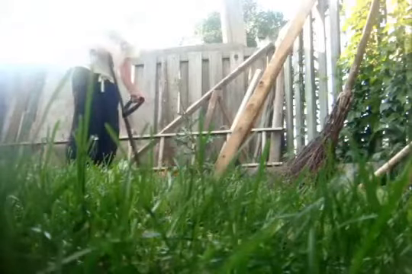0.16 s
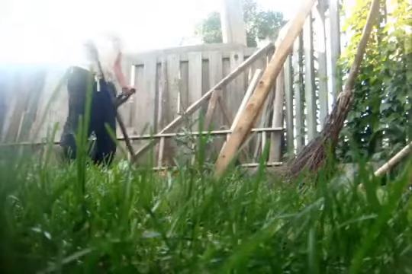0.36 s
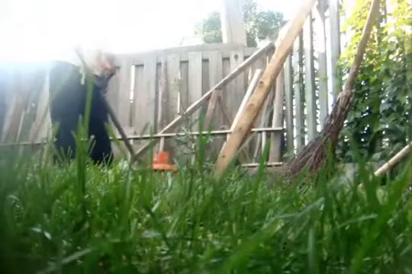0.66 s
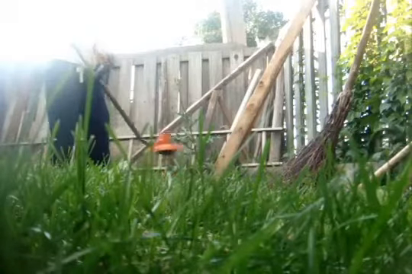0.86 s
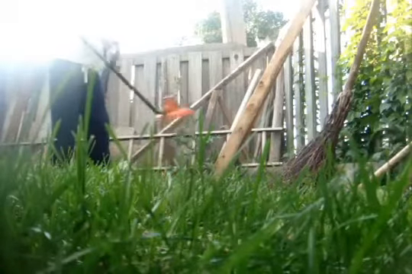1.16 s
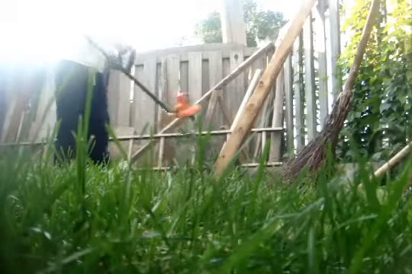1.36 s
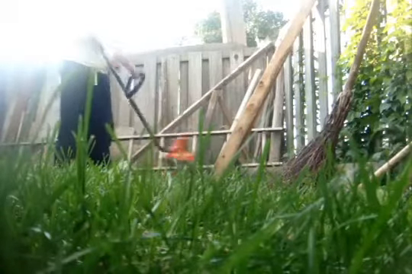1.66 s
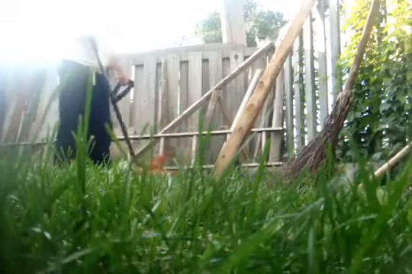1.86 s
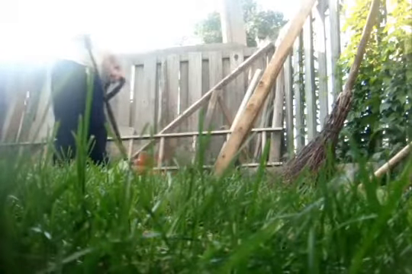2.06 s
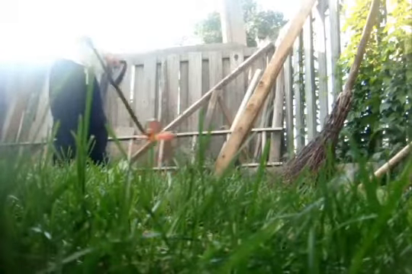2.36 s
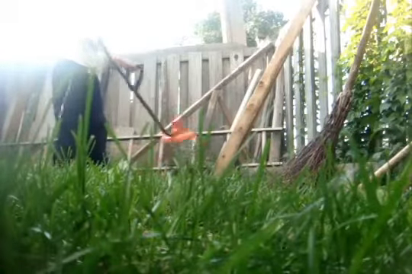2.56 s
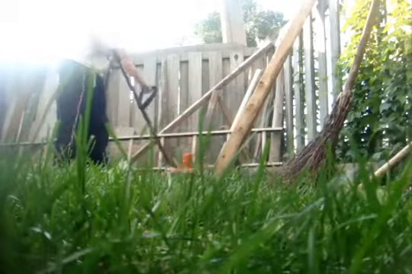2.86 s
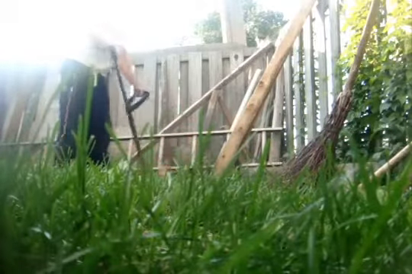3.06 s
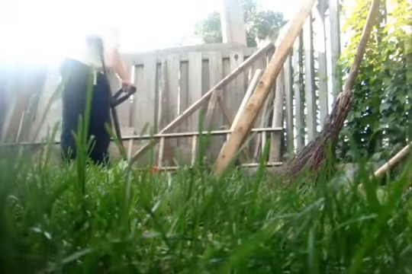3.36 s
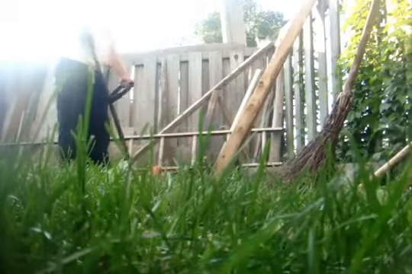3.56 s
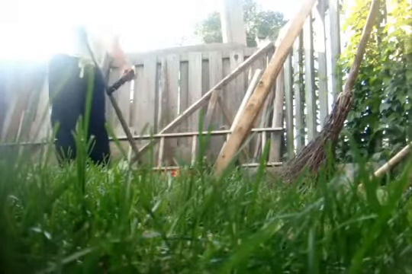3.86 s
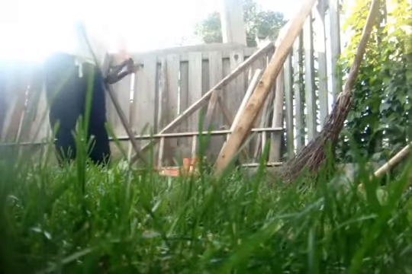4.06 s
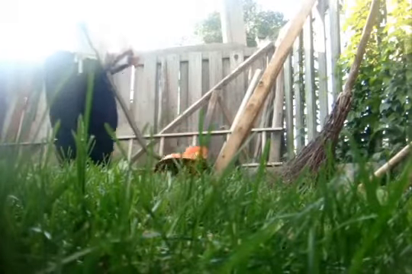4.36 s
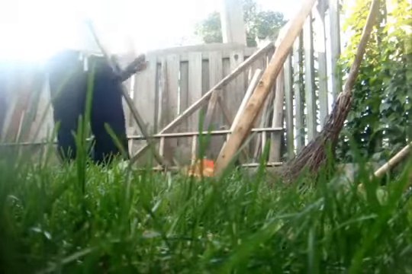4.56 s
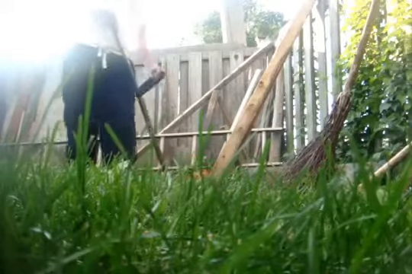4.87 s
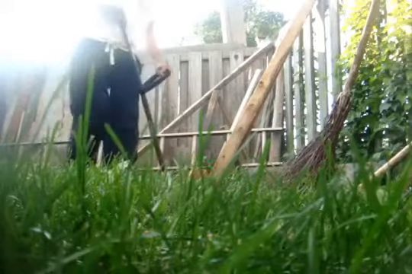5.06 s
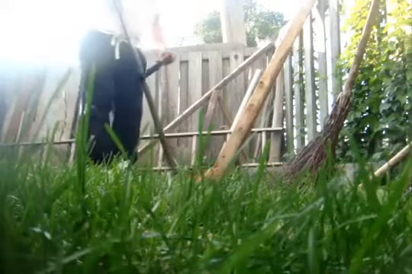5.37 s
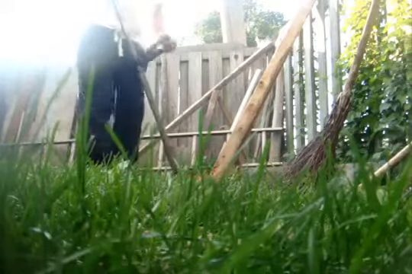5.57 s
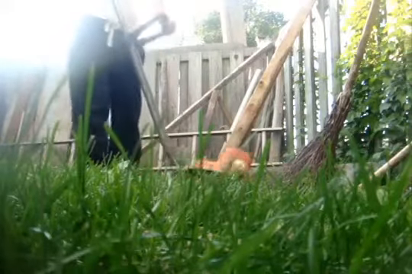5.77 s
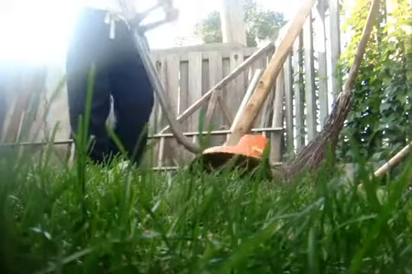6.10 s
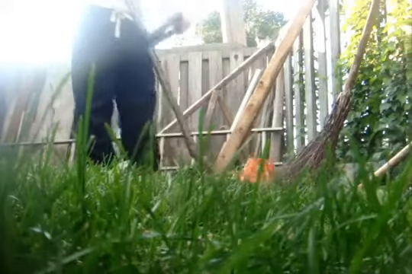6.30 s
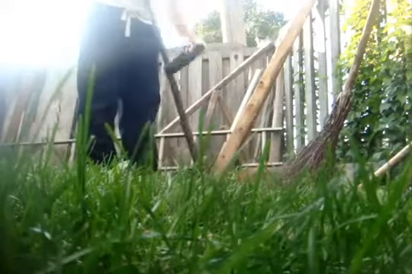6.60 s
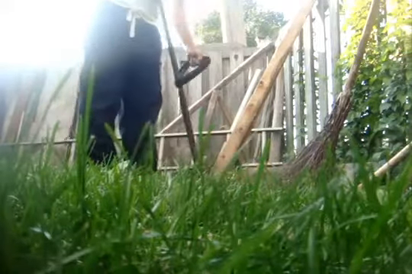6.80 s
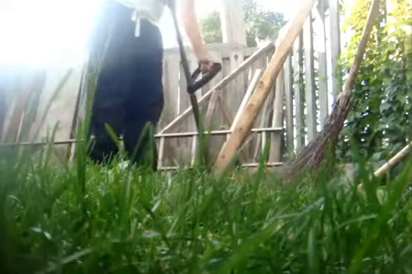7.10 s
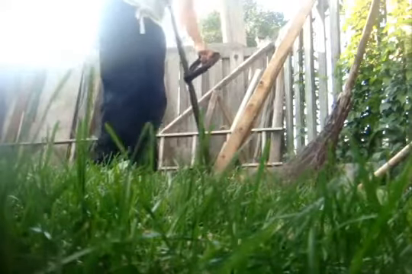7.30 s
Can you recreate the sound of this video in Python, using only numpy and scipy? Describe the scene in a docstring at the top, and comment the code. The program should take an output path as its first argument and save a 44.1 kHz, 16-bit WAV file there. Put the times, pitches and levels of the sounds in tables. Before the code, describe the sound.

An electric string trimmer runs throughout in a small fenced yard, heard from low in the grass a few metres away. Its raspy buzz and airy motor hiss rise and fall as the head swings. Early on the line rasps on wood with sharp grit cracks and the pitch dips; another scrape follows around three seconds, then heavier grass cutting, densest near six seconds and again at the end.

```python
"""Lawn edge along a wooden fence: a corded string trimmer at work.
The whirling line hums and buzzes as harmonics of its passes; tabulated loads slow the head.
Each pass swishes and slaps through grass; on the boards the line rasps and ticks, and grit cracks.
Shaped noise makes the motor's air hiss and vent whistles, tones tied to the head its whine.
Ground, guard and fence throw short echoes; faint outdoor noise lies behind."""
import sys
import numpy as np
from scipy import signal
from scipy.fft import rfft, irfft, next_fast_len
from scipy.io import wavfile
from scipy.ndimage import uniform_filter1d

SR = 44100
rng = np.random.default_rng(int(sys.argv[2]) if len(sys.argv) > 2 else 0)


def generate_wav(signal):
    """Clip the signal to [-1, 1] and save it as 16-bit WAV at the path in sys.argv[1]."""
    frames = np.transpose(np.atleast_2d(signal))
    scaled = np.clip(frames, -1, 1) * 32767
    pcm = np.round(scaled).astype(np.int16)
    wavfile.write(sys.argv[1], SR, pcm)


N = 328104

# A pass is one line end going by: two to a turn of the head.
NOMINAL_PASSES_PER_S = 156   # reference for ground lag and whistle pitch
FREE_PASSES_PER_S, START_PASSES_PER_S, RECOVER_S = 158.36, 155.22, .587
# Loads braking the head: (start [s], end [s], drag [passes/s lost per s])
LOADS = [(1.293, 1.687, 9.4), (1.611, 1.937, 49.7), (2.852, 3.017, 82.3), (4.05, 4.22, 11), (4.22, 4.85, 5),
         (5.699, 5.931, 46.8), (5.931, 6.3, 13), (6.3, 6.56, 7), (6.56, 7.0, 15.5), (7.15, 7.44, 16.5)]

# First harmonic of the hum as the head is swung and tilted: (time [s], level before trim [dB])
HUM_FIRST = [(0.0, -30.5), (0.23, -30), (0.52, -39), (0.99, -31.5), (1.76, -55), (2.67, -35.5),
             (3.02, -47.5), (3.36, -40), (3.75, -41), (3.96, -30), (4.16, -29), (4.56, -40), (5.26, -31),
             (5.76, -30.5), (5.82, -38), (6.24, -44), (7.29, -32), (7.44, -42)]
# Second harmonic of the hum: (time [s], level before trim [dB])
HUM_SECOND = [(0.0, -29.5), (0.54, -27.5), (1.06, -38), (1.3, -24), (1.37, -35), (1.55, -24), (1.84, -45),
              (2.18, -33.5), (2.96, -31.5), (3.07, -42), (3.36, -29.5), (4.31, -26.5), (4.43, -38),
              (4.56, -39), (4.83, -28.5), (4.99, -43.5), (5.04, -30), (5.22, -25.5), (5.51, -29),
              (5.62, -18.5), (5.74, -34), (5.8, -24), (6.03, -39), (7.0, -26), (7.15, -41), (7.21, -24),
              (7.38, -22), (7.44, -22.5)]
# Upper buzz spectrum: (harmonic [multiple of pass rate], relative level [dB])
BUZZ_HARMONICS = [(3, 1), (4, 2.35), (5, 1), (6, -2.5), (7, -2.5), (8, -4), (9, -8.5), (10, -16.5),
                  (11, -12), (13, -20), (15, -25), (18, -17.5), (24, -22), (32, -51)]
# Upper buzz of the free line: (time [s], level before trim [dB])
BUZZ_LEVEL = [(0, -29), (.43, -29), (.57, -25), (1.2, -30.5), (1.62, -25.5), (1.77, -43), (2.3, -34.5),
              (2.82, -33.5), (3.12, -36.5), (3.92, -22), (4.3, -23.5), (4.72, -32), (5.2, -22.5),
              (5.5, -22.5), (5.68, -26), (6.3, -32), (6.5, -27), (7.44, -29.5)]
# Ground reflection as the head rises and sinks: (time [s], lag at nominal speed [ms])
GROUND_LAG = [(.25, 2.9), (.55, 1.75), (1.35, 2.18), (1.7, 0.77), (2.05, 3.14), (2.6, 3.2), (3.05, 1.65),
              (3.45, 3.4), (3.65, 2.05), (4.15, 1.8), (4.35, 2.65), (4.7, 2.65), (4.85, 1.81), (5.45, 1.97),
              (5.7, 2.8), (6.35, 1.58), (6.95, 1.73), (7.24, 2.6), (7.44, 1.14)]

# Bites into thick grass: (start [s], end [s], grass drive [dB], added buzz before trim [dB])
CUTS = [(0.38, 0.513, -25.5, -51), (1.455, 1.63, -26, -28), (1.769, 1.794, -25.5, -37),
        (1.884, 1.917, -28, -46), (2.92, 2.957, -25, -33), (4.065, 4.186, -24.5, -25),
        (4.17, 4.261, -22, -21.5), (4.821, 4.917, -29.5, -32), (5.676, 5.793, -19.5, -21),
        (5.789, 5.996, -18.5, -22), (6.53, 6.647, -26, -24.5), (6.754, 6.874, -24, -32.5),
        (6.877, 6.919, -20.5, -28), (6.974, 7.197, -27, -39), (7.202, 7.314, -24, -30),
        (7.323, 7.438, -21.5, -19.5)]
CUT_ATTACK_S, CUT_RELEASE_S = 0.011, 0.024
# Light brushing of grass tips: drive at mean buzz level, share of the buzz's dB swing
BRUSH_DB, BRUSH_FOLLOWS = -32.5, 0.8
# Swish of the blades: (frequency [Hz], relative density [dB/Hz])
SWISH_SPECTRUM = [(40, -44), (140, -23), (330, -1.5), (600, 1), (850, 1), (1250, 0.5), (1700, -16),
                  (2600, -52), (6000, -55)]

# Line on the fence: (start [s], end [s], level before trim [dB])
RASPS = [(1.33, 1.364, -20.5), (1.374, 1.413, -18.5), (1.425, 1.495, -20.5), (1.497, 1.56, -25.5),
         (1.562, 1.595, -23), (1.611, 1.638, -19), (1.645, 1.73, -21), (1.735, 1.828, -23),
         (1.886, 1.94, -23.5), (2.844, 2.999, -19.5), (3.0, 3.04, -25.5), (3.054, 3.097, -25.5),
         (6.877, 6.923, -25), (7.103, 7.143, -23), (7.21, 7.27, -27.5), (7.325, 7.44, -25.5)]
# Scratch of line on wood, also the grit's rattle: (frequency [Hz], relative density [dB/Hz])
RASP_SPECTRUM = [(200, -16.5), (900, -6), (2000, -8), (3400, -2), (4700, -3), (6500, 2), (8500, -3),
                 (10000, -8.5), (15000, -2.5)]
# Grit flung against guard and boards: (time [s], crack drive [dB])
GRIT_HITS = [(1.437, -6), (1.584, 0), (1.635, 0), (1.6457, -3), (1.7385, -1), (1.7866, -1), (1.7998, -3),
             (2.843, -7), (2.942, 1), (4.972, -8.5), (6.902, -11), (7.013, -6)]

# Motor air hiss: (time [s], level before trim [dB])
HISS_LEVEL = [(0, -30.5), (.6, -31), (.9, -27), (1.3, -25.5), (1.86, -33.5), (2.15, -36), (2.55, -27),
              (2.8, -28.5), (3.15, -34), (3.85, -32.5), (4.03, -26.5), (4.3, -27.5), (5.1, -32), (5.6, -28),
              (5.85, -23.5), (6.15, -27.5), (6.8, -30), (7.3, -26.5)]
# Motor air hiss: (frequency [Hz], relative density [dB/Hz])
HISS_SPECTRUM = [(200, -10.5), (800, 3), (1500, 0.5), (2300, 1.5), (3500, 0), (5000, 2.5), (8000, 4.5),
                 (10000, 4), (12000, 4), (15000, -0.5)]
# Housing resonances: (centre [Hz], width [Hz], level re hiss [dB])
HOUSING = [(2114, 120, -24), (3752, 38, -23.5), (4650, 160, -22)]
# Air vent whistles: (centre at nominal speed [Hz], width [Hz], relative level [dB])
WHISTLES = [(9820, 250, -5), (9540, 1900, -8), (14500, 1000, -5)]
WHISTLE_AWAY_DB = -31   # vents facing away
# Vents turned to the listener by tilting: (start [s], end [s], added whistle gain [dB])
VENT_FLARES = [(.85, 1.05, -26), (4.3, 4.72, -24), (6.02, 6.42, -23.5)]
VENT_ATTACK_S, VENT_RELEASE_S = 0.017, 0.045
WHISTLE_CHOKE = 0.61   # share of whistle lost at the deepest cut

# Motor tones, one pass rate apart: (frequency [multiple of pass rate], relative level [dB])
WHINE_TONES = [(11.78, 0), (12.78, 0), (13.78, -2)]
# Whine as the housing turns: (time [s], drive [dB])
WHINE_LEVEL = [(.4, -48), (.8, -38), (1.45, -30), (1.9, -50), (2.5, -34.5), (3.15, -48), (4, -35.5),
               (4.55, -47), (4.9, -36.5), (5.6, -33.5), (6.1, -40.5), (6.7, -33.5), (7.44, -38)]
WHINE_RING_HZ, WHINE_RING_WIDTH_HZ = 2032, 82   # brings out the nearest tone

# Ground, guard and fence: (delay [s], gain re direct [dB])
ECHOES = [(.0029, -46), (.0047, -26.5), (.0083, -28), (0.0127, -39.5), (0.023, -31), (.037, -11)]
# Outdoor background: (frequency [Hz], relative density [dB/Hz])
OUTDOOR_SPECTRUM = [(20, -5), (60, -7), (150, 2), (600, -26), (8000, -19)]

SHELF_HZ, CUTOFF_HZ = 10020, 14850


def head_speed():
    """Pass rate: loads drag it down, the motor pulls it back with a time constant."""
    t = np.arange(N) / SR
    drag = sum(rate * ((t >= start) & (t < end)) for start, end, rate in LOADS)
    start_deficit = (FREE_PASSES_PER_S - START_PASSES_PER_S) * np.exp(-t / RECOVER_S)
    return FREE_PASSES_PER_S - start_deficit - RECOVER_S * lagging(drag, RECOVER_S)


def line_hum(passes, buzz_gain, scatter_rad=0.38, flutter_db=-0.13, first_trim_db=-0.9,
             second_trim_db=0.0, buzz_trim_db=.5, ground_gain=0.52, imbalance=0.16):
    """A push and a pull of air each pass; the ground lag sets which buzz harmonics are favoured."""
    first_db, = in_time(HUM_FIRST)
    second_db, = in_time(HUM_SECOND)
    lag_ms, = in_time(GROUND_LAG)
    angle = 2 * np.pi * passes
    ground_phase = 2 * np.pi * NOMINAL_PASSES_PER_S * lag_ms / 1000
    orders, levels_db = np.transpose(BUZZ_HARMONICS)

    buzz = 0
    for k in range(3, 33):
        gain = from_db(np.interp(k, orders, levels_db) + 1.6 * drift(2.5))
        phase = k * angle + scatter_rad * np.sqrt(k) * drift(1.52)
        buzz = buzz - gain * (np.sin(phase) + ground_gain * np.sin(phase - k * ground_phase))
    buzz /= np.sqrt(uniform_filter1d(buzz ** 2, size=4000))   # even local power
    buzz *= 1 + imbalance * np.cos(angle / 2)   # one line end a little longer
    buzz *= from_db(buzz_trim_db) * buzz_gain * per_pass(passes, flutter_db)

    first = from_db(first_db + first_trim_db) * np.sin(angle)
    second = from_db(second_db + second_trim_db) * np.sin(2 * angle)
    return buzz - np.sqrt(2) * (first + second)


def grass(passes, gain, slap_db=-2.0, swish_db=-4, thick_db=-26, slap_hz=640, edge_hz=900):
    """Each pass swishes through the blades; in thick grass it lands as an uneven dull slap."""
    thick = gain ** 2 / (gain ** 2 + from_db(thick_db) ** 2)
    jittered_passes = passes - .03 + .022 * drift(50)
    clicks = strikes(jittered_passes, spread_db=6)
    dull = resonate(resonate(clicks, slap_hz, 750), edge_hz, 900)
    slaps = rms_one(yard(dull))
    blades = noise(SWISH_SPECTRUM) * throb(passes, depth_db=2.0)
    swish = yard(blades * per_pass(passes, spread_db=-1.5))
    return gain * (from_db(slap_db) * thick * slaps + from_db(swish_db) * swish)


def fence_rasp(passes, trim_db=4.5, tick_db=-9, tick_hz=4000, crackle_db=2.0,
               ring_hz=4850, ring_width_hz=450, ring_db=-13):
    """While the tip touches wood it scratches brightly, rings the guard and ticks once a pass."""
    contact = from_db(trim_db) * swells(RASPS, attack_s=0.0021, release_s=0.0054)
    crackle = from_db(crackle_db * drift(215))
    scratch = noise(RASP_SPECTRUM) * per_pass(passes, spread_db=1.4) * crackle
    ring = rms_one(resonate(scratch, ring_hz, ring_width_hz))
    clicks = strikes(passes, spread_db=3.5)
    ticks = rms_one(resonate(resonate(clicks, tick_hz, 6100), tick_hz, 7600))
    return contact * (rms_one(scratch + from_db(ring_db) * ring) + from_db(tick_db) * ticks)


def grit(crack_hz=3800, width_hz=4500, rattle_s=0.01, rattle_db=-17):
    """Each hit is a resonated click with a decaying noise rattle."""
    clicks = np.zeros(N)
    for s, db in GRIT_HITS:
        clicks[int(s * SR)] = from_db(db)
    crack = resonate(resonate(clicks, crack_hz, width_hz), crack_hz, 2 * width_hz)
    crack *= clicks.max() / np.abs(crack).max()
    decay = signal.lfilter([1], [1, -np.exp(-1 / (rattle_s * SR))], clicks + 1e-18)
    return crack + from_db(rattle_db) * decay * noise(RASP_SPECTRUM)


def motor_air(passes, speed, cut, hiss_trim_db=5.5, shift=0.2, flicker_db=1.22,
              whistle_flicker_db=2.0):
    """Fan hiss plus housing resonances; vent whistles flicker with it and sag a little with speed."""
    hiss_db, = in_time(HISS_LEVEL)
    flicker = drift(25)
    hiss = noise(HISS_SPECTRUM) * throb(passes, depth_db=2.0) * from_db(flicker_db * flicker)
    for hz, width_hz, db in HOUSING:
        hiss += from_db(db) * rms_one(resonate(rng.standard_normal(N), hz, width_hz))

    # warped time [s]: share `shift` of the speed change reaches the pitch
    travel_s = np.cumsum(1 + shift * (speed / NOMINAL_PASSES_PER_S - 1)) / SR
    whistle = 0
    for hz, width_hz, db in WHISTLES:
        lowpass = signal.butter(2, width_hz / 2, fs=SR, output="sos")
        real, imag = signal.sosfilt(lowpass, rng.standard_normal((2, N)))
        band = ((real + 1j * imag) * np.exp(2j * np.pi * hz * travel_s)).real
        whistle = whistle + from_db(db) * rms_one(band)
    pulsing = throb(passes, depth_db=5)
    whistle *= rms_one(from_db(whistle_flicker_db * flicker) * pulsing)

    facing = from_db(WHISTLE_AWAY_DB) + swells(VENT_FLARES, VENT_ATTACK_S, VENT_RELEASE_S)
    unchoked = 1 - WHISTLE_CHOKE * cut / cut.max()
    return from_db(hiss_db + hiss_trim_db) * hiss + facing * unchoked * whistle


def motor_whine(passes, waver_rad=1.1, flutter_db=2):
    """Thin, wavering tones geared to the head swell as they near a resonance of the housing."""
    level_db, = in_time(WHINE_LEVEL)
    tones = 0
    for multiple, db in WHINE_TONES:
        gain = from_db(db + flutter_db * drift(5.4))
        phase = 2 * np.pi * multiple * passes + waver_rad * drift(6.0)
        tones = tones + gain * np.sin(phase)
    return np.sqrt(2) * from_db(level_db) * resonate(tones, WHINE_RING_HZ, WHINE_RING_WIDTH_HZ)


def yard(x):
    """Short delayed copies, scaled by the summed power of the paths."""
    out = x.copy()
    for delay_s, db in ECHOES:
        lag = max(1, int(delay_s * SR))
        out[lag:] += from_db(db) * x[:-lag]
    return out / np.sqrt(1 + sum(from_db(db) ** 2 for _, db in ECHOES))


def outdoors(level_db=-57):
    """Steady background as low-weighted noise."""
    return from_db(level_db) * noise(OUTDOOR_SPECTRUM)


def per_pass(passes, spread_db):
    """Random strength per pass; peaks capped at 1.5 spreads, or dips if the spread is negative."""
    index = (passes + .5).astype(int)   # changes midway between passes
    draws = np.minimum(rng.standard_normal(N // 100), 1.5)
    return rms_one(from_db(spread_db * draws)[index])


def throb(passes, depth_db):
    """Gain peaking each time the line comes round, unit power."""
    return rms_one(from_db(depth_db * np.cos(np.pi * passes) ** 8))


def strikes(passes, spread_db):
    """One click a pass, uneven in strength."""
    return np.diff(np.floor(passes), prepend=0) * per_pass(passes, spread_db)


def swells(rows, attack_s, release_s):
    """Summed gain of events that each rise, hold and die away."""
    t = np.arange(N) / SR
    total = 0
    for start, end, db in rows:
        rise = 1 - np.exp(-np.clip((t - start) / attack_s, 0, 20))
        fall = np.exp(-np.clip((t - end) / release_s, 0, 20))
        total = total + from_db(db) * rise * fall
    return total


def lagging(x, seconds):
    """First-order lag with a time constant."""
    r = np.exp(-1 / (seconds * SR))
    return signal.lfilter([1 - r], [1, -r], x + 1e-18)


def resonate(x, hz, width_hz):
    """One two-pole resonance, about unit gain at its peak."""
    r = np.exp(-np.pi * width_hz / SR)
    zeros = np.array([1, 0, -1]) * (1 - r * r) / 2
    poles = [1, -2 * r * np.cos(2 * np.pi * hz / SR), r * r]
    return signal.lfilter(zeros, poles, x + 1e-18)


def noise(spectrum):
    """Steady noise of a given colour, unit power."""
    hz, db = np.transpose(spectrum)
    size = next_fast_len(N)
    bins_hz = np.maximum(np.fft.rfftfreq(size, 1 / SR), 1)
    gain = from_db(np.interp(np.log(bins_hz), np.log(hz), db))
    return rms_one(irfft(rfft(rng.standard_normal(size)) * gain, size)[:N])


def drift(rate_hz):
    """Slow random wander, unit power: twice low-passed noise made at SR / 40."""
    r = np.exp(-80 * np.pi * rate_hz / SR)
    white = rng.standard_normal(N // 40 + 2002)
    slow = signal.lfilter([1], [1, -2 * r, r * r], white)[2000:]   # skip the filter's start
    return np.interp(np.arange(N) / 40, np.arange(len(slow)), rms_one(slow))


def in_time(rows):
    """Each column of a curve, interpolated at every sample."""
    s, *columns = np.transpose(rows)
    return [np.interp(np.arange(N) / SR, s, c) for c in columns]


def rms_one(x):
    """Scale to unit power."""
    return x / np.sqrt(np.mean(x ** 2) + 1e-20)


def from_db(db):
    """Decibels to gain."""
    return 10 ** (np.asarray(db) / 20)


def scene(free_wobble=.0007, cut_wobble=.04):
    """The turning head times the layers; a cut raises grass and buzz and unsettles the speed."""
    cut = swells([(start, end, db) for start, end, db, _ in CUTS], CUT_ATTACK_S, CUT_RELEASE_S)
    cut_buzz = swells([(start, end, db) for start, end, _, db in CUTS], CUT_ATTACK_S, CUT_RELEASE_S)
    speed = head_speed()
    wobble = (free_wobble + cut_wobble * cut) * drift(12.4)
    passes = np.cumsum(speed * (1 + wobble)) / SR

    buzz_db, = in_time(BUZZ_LEVEL)
    brush = from_db(BRUSH_DB + BRUSH_FOLLOWS * (buzz_db - buzz_db.mean()))
    hum = line_hum(passes, np.hypot(from_db(buzz_db), cut_buzz))
    cutting = grass(passes, np.hypot(brush, cut)) + fence_rasp(passes) + yard(grit())
    motor = motor_air(passes, speed, cut) + motor_whine(passes)
    return (hum + cutting + motor + outdoors())[None]


def record(dry, top_db=-13):
    """Treble above the shelf is lowered, peaks are rounded, the range above the cutoff is removed."""
    shelf = signal.ellip(10, .05, 60, SHELF_HZ, fs=SR, output="sos")
    below = signal.sosfiltfilt(shelf, dry)
    coloured = below + from_db(top_db) * (dry - below)
    rounded = coloured / (1 + (coloured / .75) ** 8) ** (1 / 8)   # soft ceiling at .75
    cutoff = signal.ellip(12, .1, 80, CUTOFF_HZ, fs=SR, output="sos")
    return signal.sosfilt(cutoff, rounded)


dry = scene()
out = record(dry)
generate_wav(out)
```